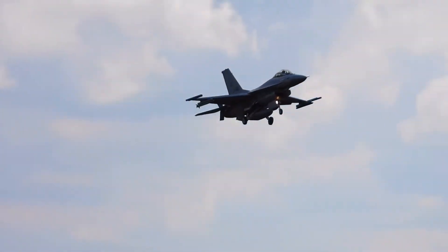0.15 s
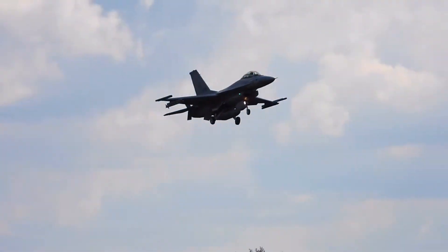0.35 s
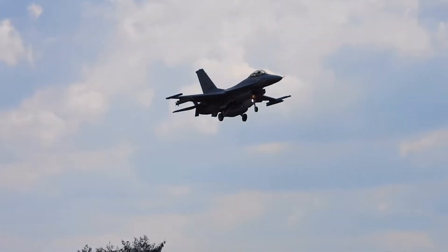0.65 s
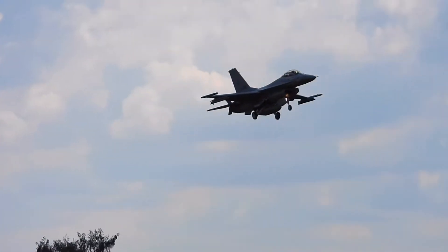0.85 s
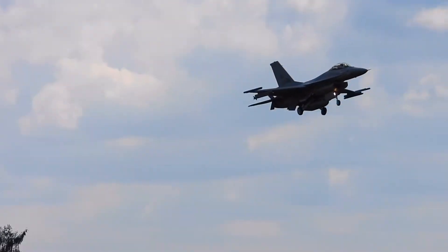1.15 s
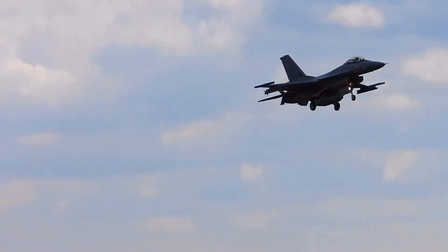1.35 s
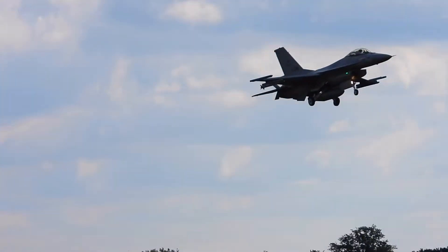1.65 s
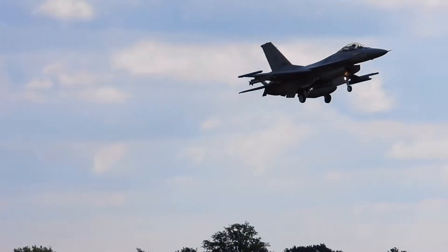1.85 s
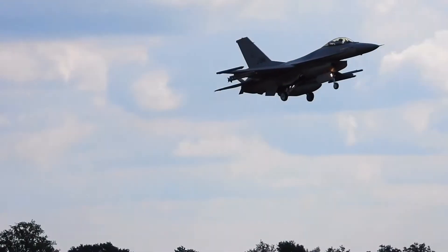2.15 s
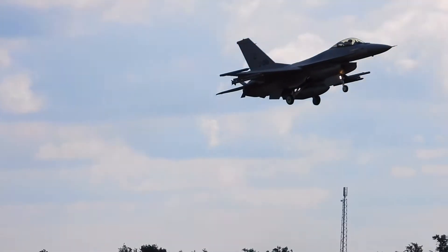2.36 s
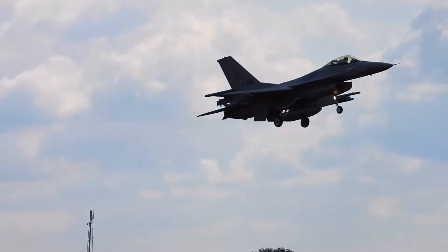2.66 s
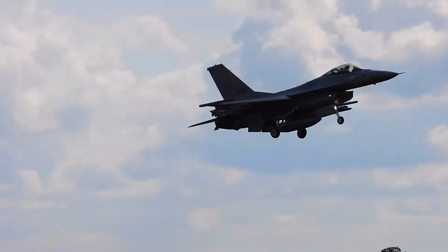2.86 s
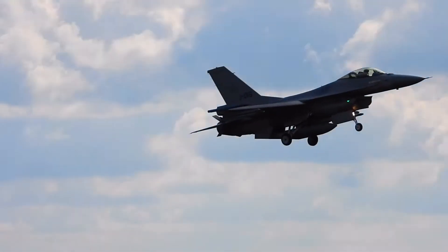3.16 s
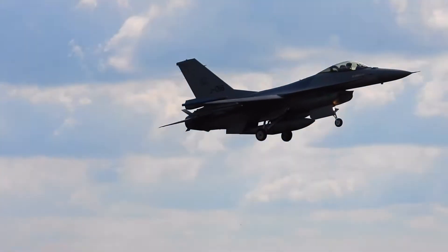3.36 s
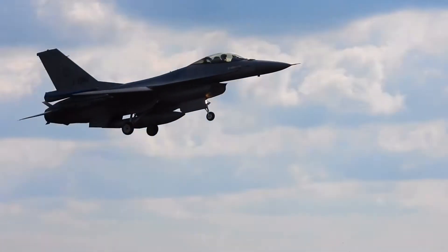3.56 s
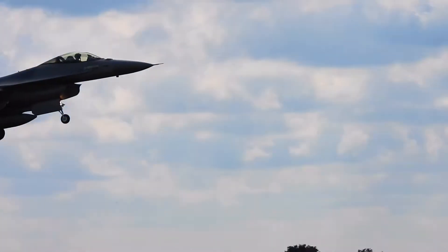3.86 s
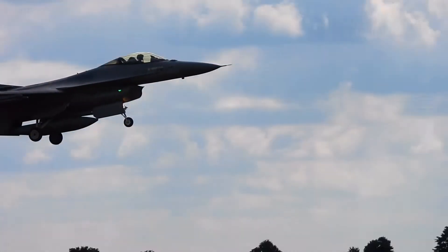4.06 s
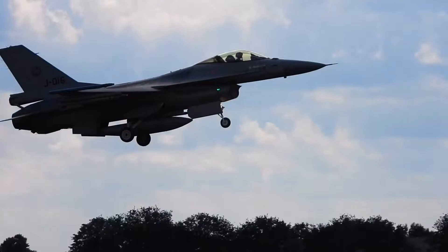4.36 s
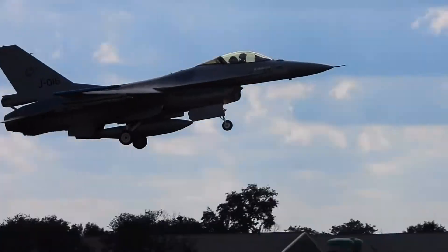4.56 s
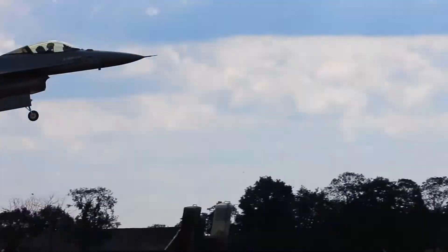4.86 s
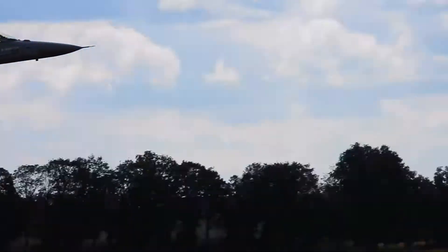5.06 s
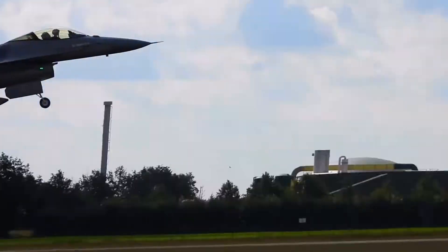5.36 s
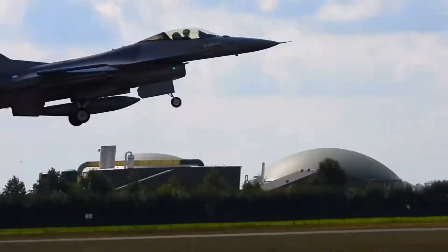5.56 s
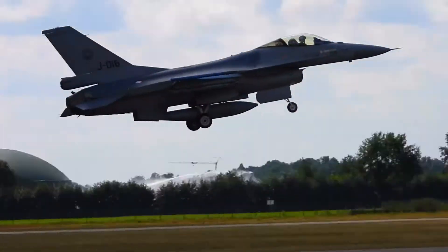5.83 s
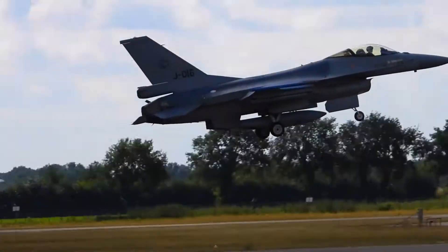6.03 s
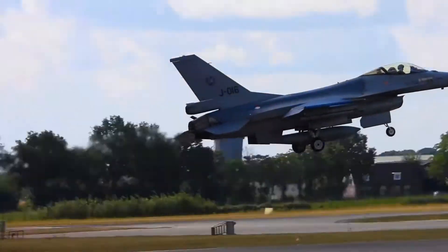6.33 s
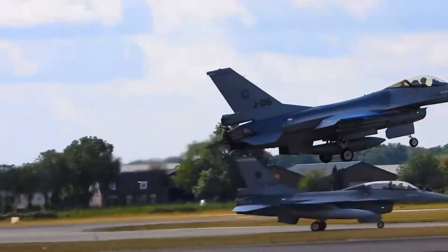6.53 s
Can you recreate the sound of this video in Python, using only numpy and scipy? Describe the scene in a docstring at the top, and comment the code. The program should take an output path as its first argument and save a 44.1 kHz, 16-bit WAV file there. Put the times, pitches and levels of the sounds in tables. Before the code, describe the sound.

A jet fighter approaches to land, heard outdoors from the side of an airfield. Its high, fluttering whine climbs in pitch over a rushing hiss, with a rough buzz beneath. The sound surges and fades in gusty air. As the jet draws level, the exhaust roar swells and the whine sinks and weakens. A second jet idles with a faint breathy whistle and low rumble.

```python
"""A jet landing across an airfield

A jet glides in. Its fan whines at the blade-passing frequency and buzzes on shaft orders, the intake
hisses, and the exhaust roars as it draws level. Gusty air makes all of it surge and fade, and the
ground reflection cuts a notch in the roar. A second engine idles on the ground with a breathy whistle
over a low rumble."""
import sys
import numpy as np
from scipy import signal
from scipy.io import wavfile
from scipy.ndimage import uniform_filter1d

SR = 44100
rng = np.random.default_rng(int(sys.argv[2]) if len(sys.argv) > 2 else 0)


def unload_audio(sound):
    """Save the sound as a 16-bit wav file, at the path given as the first command line argument."""
    columns = np.transpose(np.atleast_2d(sound))
    # keep every value between -1 and 1, then stretch to whole-number steps
    steps = np.round(np.clip(columns, -1, 1) * 32767)
    wavfile.write(sys.argv[1], SR, steps.astype(np.int16))


N = 295029
TIME = np.arange(N) / SR
LEFT_LEAD_S = 1.9e-5  # sound from one side reaches the left channel first

# The jet's broadband noise. Each row: time in seconds, roar level in dB, hiss level in dB,
# hiss tilt in dB per octave, sizzle level in dB.
JET_LEVELS = [(0, -31.5, -21, 2.5, -45.5), (.9, -30.5, -23, 4, -45.5), (1.4, -32, -20.5, 1.5, -41.5),
              (2.1, -25.5, -18.5, -1, -39.5), (2.7, -24, -16.5, -1.5, -34), (3.3, -25.5, -21.5, 1, -35.5),
              (4, -23.5, -18.5, -2, -33.5), (4.45, -21, -19, -3, -35), (4.8, -14.5, -17.5, 0.5, -34.5),
              (5.3, -18, -23, 1, -40), (5.9, -17.5, -24, 2, -39.5), (6.69, -20, -24.5, 0, -42)]
# The spectra of its three parts. Each row: frequency in Hz, relative spectral density in dB.
ROAR_SPECTRUM = [(150, -26), (260, -29.5), (342, -3.5), (560, -0.5), (850, 0.5), (1250, -2.5),
                 (1640, -12.5), (2100, -60)]
HISS_SPECTRUM = [(410, -7.5), (700, -11), (1250, 1), (2170, 0.5), (3200, -2.5), (4470, -6.5), (5460, -15.5),
                 (7000, -36)]
SIZZLE_SPECTRUM = [(4500, -5.5), (5500, -4), (6500, 3.5), (8000, -4), (10000, -18), (12500, -33),
                   (15700, -70)]
LOW_OVER_RUNWAY_S = 4.55, 5

def jet_noise(hz, t):
    """Incoherent sources add in power: exhaust roar, intake hiss, sizzle and a faint noise floor."""
    roar_db, hiss_db, tilt_db, sizzle_db = curves(JET_LEVELS, t)
    roar = spectrum(ROAR_SPECTRUM, hz) * gain_of(roar_db)
    hiss = spectrum(HISS_SPECTRUM, hz) * gain_of(tilt_db * octaves_above(2200, hz))
    hiss = hiss / np.sqrt(np.mean(hiss ** 2, 0)) * gain_of(hiss_db)
    sizzle_tilt_db = np.interp(t, LOW_OVER_RUNWAY_S, [0, 14.5])  # abeam, the air dulls it less
    sizzle = spectrum(SIZZLE_SPECTRUM, hz) * gain_of(sizzle_db + sizzle_tilt_db * octaves_above(7500, hz))
    power = roar ** 2 + hiss ** 2 + sizzle ** 2 + gain_of(-60.5) ** 2
    return np.sqrt(power) * small_eddies(hz, t)


# The fan spools up and down, and sinks in pitch as it passes.
# Each row: time in seconds, blade-passing frequency in Hz.
BLADE_RATE = [(0, 4190), (.26, 4630), (.73, 5600), (1.08, 5930), (1.4, 6020), (1.73, 5964), (2.4, 5766),
              (2.73, 5980), (3.0, 6166), (3.38, 6324), (4.0, 6112), (4.64, 5860), (5.53, 5365), (6.2, 5230),
              (6.69, 4880)]
BLADES = 38

def fan_tone(order, db, scatter, flutter_hz):
    """Multipath interference: a tone at a multiple of the shaft rate flutters as its paths add or cancel."""
    shaft_hz = uniform_filter1d(curves(BLADE_RATE, TIME)[0], 3001) / BLADES
    turns = np.cumsum(shaft_hz) / SR + np.outer([1, -1], shaft_hz * LEFT_LEAD_S / 2)
    paths = (1 + scatter * wander(flutter_hz)) / np.sqrt(1 + scatter ** 2)  # direct plus scattered
    phasor = np.exp(2j * np.pi * (order * turns + rng.random()))
    return np.sqrt(2) * gain_of(db) * (paths * phasor).real


# The whine comes and goes. Each row: time in seconds, level in dB.
WHINE_LEVEL = [(0, -24), (.13, -21.5), (.24, -35), (.35, -21), (.54, -22.5), (.85, -46), (1.08, -29.5),
               (1.5, -29.5), (1.9, -24), (2.45, -23.5), (2.72, -23.5), (2.77, -50), (2.9, -47),
               (2.94, -25.5), (3.97, -27.5), (4.07, -34.5), (5.2, -38), (5.4, -45), (6.5, -44), (6.69, -25)]
# Its second harmonic. Each row: time in seconds, level in dB relative to the whine.
OCTAVE_LEVEL = [(0, -45), (1.5, -49), (1.7, -35), (2.6, -30), (3.0, -47), (4.3, -30), (5.1, -29),
                (5.4, -43), (6.69, -55)]

def fan_whine():
    """Periodic blade passage radiates a tone and its octave, which swell and fade together."""
    whine_db = curves(WHINE_LEVEL, TIME)[0] + 2.5 * wander(rate_hz=12).real
    octave_db = whine_db + curves(OCTAVE_LEVEL, TIME)[0]
    fundamental = fan_tone(BLADES, whine_db, scatter=1.8, flutter_hz=26)
    return fundamental + fan_tone(2 * BLADES, octave_db, scatter=1.8, flutter_hz=26)


# The buzz partials. Each entry, list by list: shaft order, relative level in dB with the jet far
# ahead, relative level in dB with it near.
BUZZ_ORDERS = [11, 13, 16, 17, 18, 21, 22, 25, 27, 28, 29, 31, 32, 66]
BUZZ_FAR_DB = [-15, -5, -6, -15, -10, -15, -6, -15, -15, -1, -9, -18, -14, -34]
BUZZ_NEAR_DB = [0, -3, 0, -1, -1, -2, -3, -8, -11, -13, -20, -13, -15, -42]
# The strength of the buzz. Each row: time in seconds, level in dB relative to the intake hiss.
BUZZ_LEVEL = [(0, -27), (1, -24), (1.5, -10), (2.2, -10), (2.5, -18), (3.15, -15), (3.35, -7.5), (4, -8.5),
              (4.2, -15), (5.2, -23), (6.69, -18)]

def fan_buzz():
    """Buzz-saw noise: shock waves off unequal blade tips sound on harmonics of the shaft rate."""
    buzz_db = curves(JET_LEVELS, TIME)[1] + curves(BUZZ_LEVEL, TIME)[0]
    nearness = np.interp(TIME, (2.3, 3.0), [0, 1])  # the intake swings to another angle
    return sum(fan_tone(order, buzz_db + far + nearness * (near - far), scatter=.9, flutter_hz=18)
               for order, far, near in zip(BUZZ_ORDERS, BUZZ_FAR_DB, BUZZ_NEAR_DB))


# A brief hum at the nearest point. Each row: time in seconds, level in dB.
HUM_LEVEL = [(2.9, -60), (3.05, -34), (3.75, -34), (3.9, -60)]

def fan_hum():
    """An inharmonic partial follows the shaft rate, just above its fourth order."""
    return fan_tone(4.06, curves(HUM_LEVEL, TIME)[0], scatter=.4, flutter_hz=18)


def small_eddies(hz, t):
    """Scintillation: small eddies mottle the gain, most in the treble, less low over the runway."""
    def mottle(bins, frames):
        white = rng.standard_normal((len(hz), len(t)))
        return unit_rms(uniform_filter1d(uniform_filter1d(white, bins, 0), frames, 1))

    patches_db = 2.0 * mottle(bins=18, frames=10)
    flicker_db = 1.34 * mottle(bins=90, frames=8)
    strength = np.clip(hz / 4000, .3, 1.3)[:, None] * np.interp(t, LOW_OVER_RUNWAY_S, [1, .47])
    return gain_of(strength * (patches_db + flicker_db))


# Large eddies, each a surge or a lull. Each row: centre time in seconds, gain in dB,
# half length in seconds, centre frequency in Hz.
GUSTS = [(0.037, 1.5, 0.073, 2200), (0.344, -5.5, 0.19, 600), (0.85, 5.5, 0.18, 1840),
         (1.446, -3, 0.057, 2000), (1.768, 9.5, 0.067, 2450), (2.092, -5, .055, 2200),
         (2.254, 6, 0.026, 2800), (2.513, 6.5, 0.051, 3330), (2.628, 5, 0.074, 4860),
         (2.873, -2.5, 0.035, 4510), (2.946, 6, 0.026, 3000), (3.043, -3, .035, 3000),
         (3.12, 4.5, 0.038, 3800), (3.261, 5.5, 0.18, 385), (3.398, 8, 0.038, 3313),
         (3.474, 8.5, .035, 7000), (3.564, -2.5, 0.028, 3010), (3.773, -4, 0.028, 2600),
         (3.887, 7, 0.04, 4130), (4.015, 3.5, 0.028, 5000), (4.13, 3, 0.021, 4000),
         (4.215, -5.5, 0.047, 2550), (4.331, 5.5, 0.029, 6000), (4.629, 3, 0.052, 2200),
         (5.039, 5.5, 0.043, 1310), (5.07, 5.5, 0.045, 7000), (6.291, 3, 0.076, 797),
         (6.36, 5, 0.086, 8030)]
SURGE_OCTAVES, LULL_OCTAVES = 1.58, 2.57  # half widths

def gusts(x):
    """Refraction: each large eddy is a lens that briefly focuses or spreads a band of frequencies."""
    hz, t, spectra = signal.stft(x, SR, nperseg=512, noverlap=384)
    lens_db = 0
    for centre_s, db, half_s, centre_hz in GUSTS:
        detuning = octaves_above(centre_hz, hz) / (SURGE_OCTAVES if db > 0 else LULL_OCTAVES)
        lens_db += db * np.exp(-detuning ** 2 - ((t - centre_s) / half_s) ** 2)
    return overlap_add(spectra * gain_of(lens_db), 512)[:, :N]


# The ground notch sinks as the jet comes near. Each row: time in seconds, frequency in Hz, depth in dB.
GROUND_NOTCH = [(0, 423, 9), (.35, 404, 4), (1.05, 226, 11), (1.4, 211, -0.5), (3.5, 185, 0.5),
                (6.69, 170, 30)]
NOTCH_RELATIVE_WIDTH = 0.089

def ground_reflection(x):
    """Destructive interference of direct and reflected sound, applied as one moving notch."""
    hz, t, spectra = signal.stft(x, SR, nperseg=2048, noverlap=1536)
    notch_hz, depth_db = curves(GROUND_NOTCH, t)
    detuning = np.log((hz[:, None] + 1) / notch_hz) / NOTCH_RELATIVE_WIDTH
    return overlap_add(spectra * gain_of(-depth_db * np.exp(-detuning ** 2)), 2048)[:, :N]


# The idling engine's whistle and rumble. Each row: time in seconds, level in dB.
WHISTLE_LEVEL = [(0, -26.5), (1.05, -23.5), (1.5, -33.5), (4.2, -34), (4.7, -38), (5.2, -24.5),
                 (5.6, -26.5), (6, -21), (6.35, -30), (6.69, -29.5)]
RUMBLE_LEVEL = [(0, -39), (6.69, -43.5)]
# The rumble's spectrum. Each row: frequency in Hz, relative spectral density in dB.
RUMBLE_SPECTRUM = [(12, -50), (20, -33.5), (86, 1.5), (188, 0), (260, -0.5), (340, -21), (570, -120)]
WHISTLE_HZ, WHISTLE_WIDTH_HZ = 2807, 196

def idling_engine(hz, t):
    """Resonance: noise through one steady narrow peak makes a breathy whistle above the rumble."""
    resonance = unit_rms(1 / (1 + (2 * (hz - WHISTLE_HZ) / WHISTLE_WIDTH_HZ) ** 2))[:, None]
    wind_sway = 1 + 0.35 * np.interp(t, TIME, wander(rate_hz=3.1).real)
    whistle = resonance * gain_of(curves(WHISTLE_LEVEL, t)[0]) * wind_sway
    rumble = spectrum(RUMBLE_SPECTRUM, hz) * gain_of(curves(RUMBLE_LEVEL, t)[0])
    return whistle + rumble


# The likeness of the two channels. Each row: frequency in Hz, coherence from 0 to 1.
COHERENCE = [(40, 1), (500, 0.99), (1650, .97), (4970, 0.88), (15000, 0.1)]

def stereo_noise(magnitude, size):
    """Partial coherence: noise shaped by magnitude(hz, t) is less alike left and right in the treble."""
    hop = size // 4
    frames, hz = N // hop + 5, np.fft.rfftfreq(size, 1 / SR)
    a, b, c, d = rng.standard_normal((frames, len(hz), 4)).T
    left, independent = a + 1j * b, c + 1j * d
    knots_hz, likeness = np.transpose(COHERENCE)
    coherence = np.interp(np.log(hz + 1), np.log(knots_hz), likeness)[:, None]
    delay = np.exp(-2j * np.pi * hz * LEFT_LEAD_S)[:, None]
    right = (coherence * left + np.sqrt(1 - coherence ** 2) * independent) * delay
    white_rms = np.sqrt(np.mean(overlap_add(left, size) ** 2))
    spectra = np.array([left, right]) * magnitude(hz, np.arange(frames) * hop / SR)
    return overlap_add(spectra, size)[:, :N] / white_rms


def wander(rate_hz):
    """A complex random process of unit power, low-passed at the given rate."""
    hz = np.fft.fftfreq(N // 64 + 1, 64 / SR)
    slow = np.fft.ifft(np.exp(2j * np.pi * rng.random(len(hz))) / (1 + (hz / rate_hz) ** 2))
    return np.interp(np.arange(N) / 64, np.arange(len(hz)), unit_rms(slow))


def spectrum(points, hz):
    """Interpolation in log frequency gives a column of gains with unit mean power."""
    knots_hz, db = np.transpose(points)
    return unit_rms(gain_of(np.interp(np.log(hz + 1), np.log(knots_hz + 1), db, -99, -99)))[:, None]


def curves(rows, t):
    """Linear interpolation in time gives one curve for each column after the first."""
    knots_s, *columns = np.transpose(rows)
    return [np.interp(t, knots_s, column) for column in columns]


def overlap_add(spectra, size):
    return signal.istft(spectra, nperseg=size, noverlap=size * 3 // 4)[1]


def octaves_above(centre_hz, hz):
    return np.log2((hz[:, None] + 1) / centre_hz)


def gain_of(db):
    return 10 ** (np.asarray(db) / 20)


def unit_rms(x):
    return x / np.sqrt(np.mean(abs(x) ** 2) + 1e-20)


def scene():
    """Superposition: the jet, heard through gusts, joins the idling engine over reflecting ground."""
    fan = fan_whine() + fan_buzz() + fan_hum()
    jet = gusts(fan + stereo_noise(jet_noise, size=512))
    return ground_reflection(jet + stereo_noise(idling_engine, size=2048))


def record(dry):
    """Saturation rounds any peak above the knee; a low-pass filter then limits the band."""
    knee, cutoff_hz = .9, 15750
    excess = np.maximum(abs(dry) - knee, 0)
    clipped = np.sign(dry) * (np.minimum(abs(dry), knee) + (1 - knee) * np.tanh(excess / (1 - knee)))
    low_pass = signal.firwin(511, cutoff_hz, window=("kaiser", 9), fs=SR)
    return signal.oaconvolve(clipped, low_pass[None], "same")


dry = scene()
out = record(dry)
unload_audio(out)
```